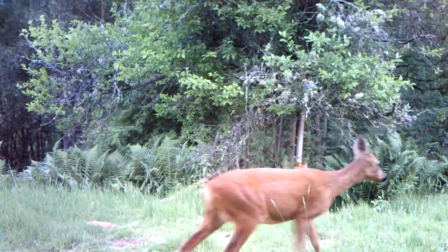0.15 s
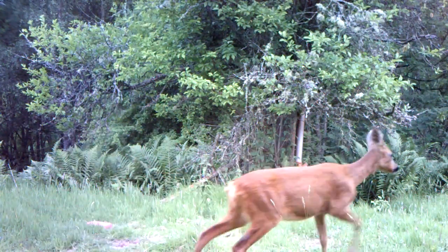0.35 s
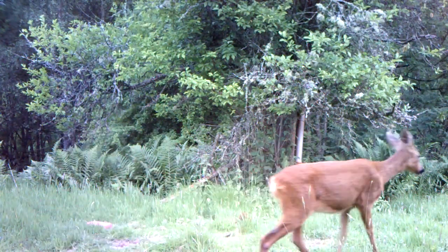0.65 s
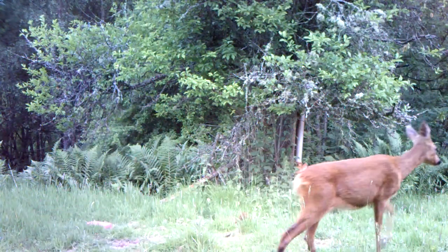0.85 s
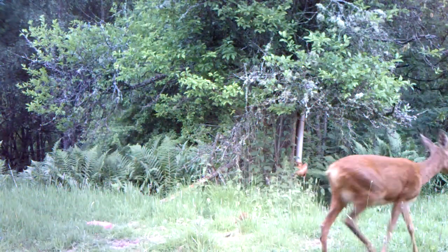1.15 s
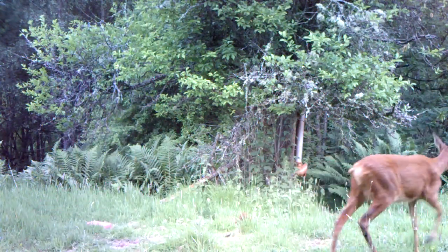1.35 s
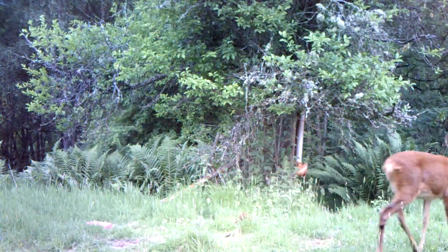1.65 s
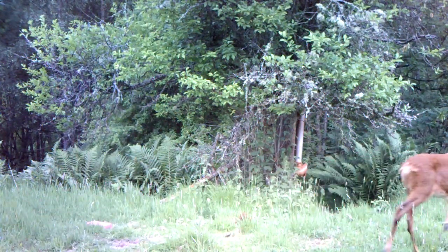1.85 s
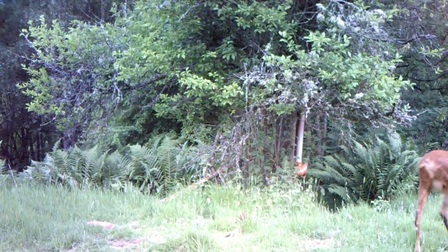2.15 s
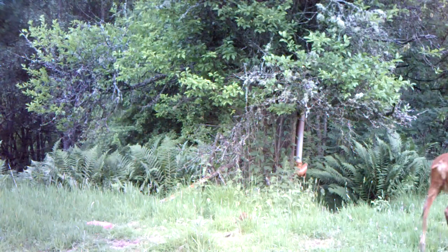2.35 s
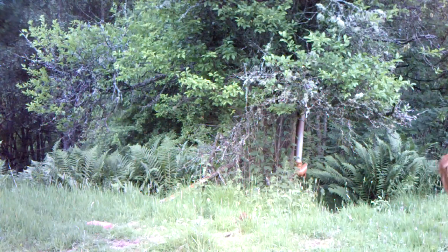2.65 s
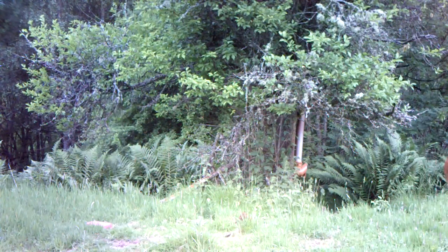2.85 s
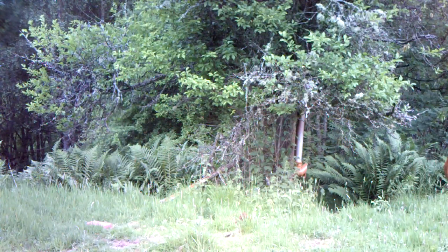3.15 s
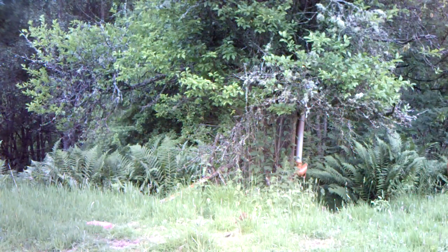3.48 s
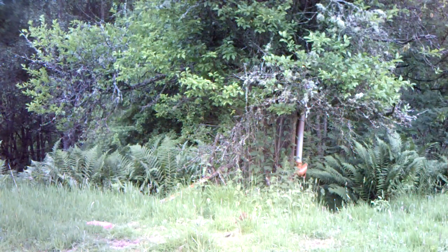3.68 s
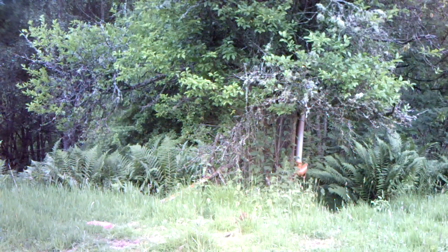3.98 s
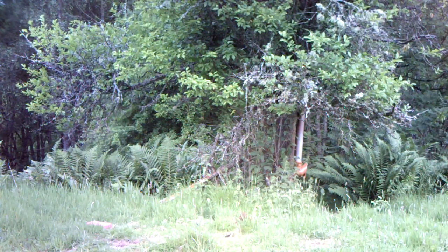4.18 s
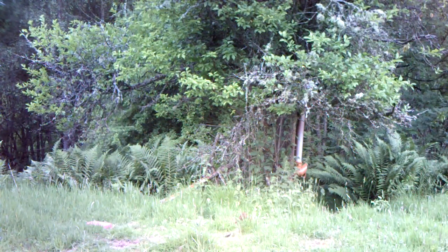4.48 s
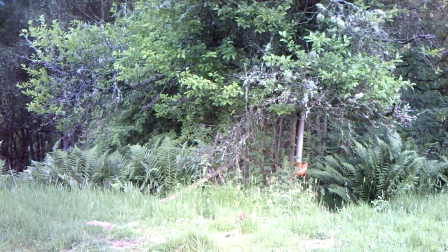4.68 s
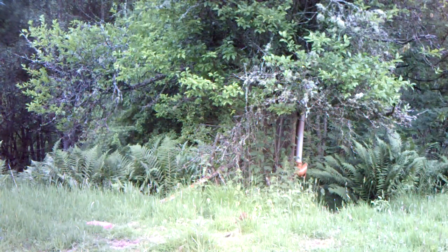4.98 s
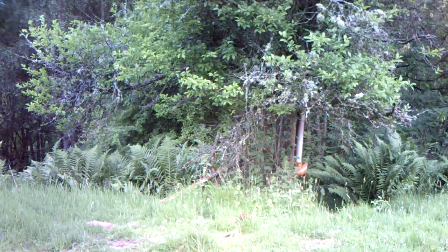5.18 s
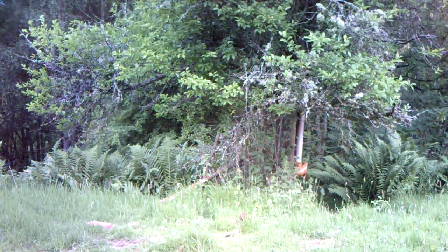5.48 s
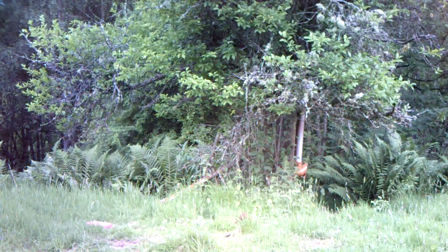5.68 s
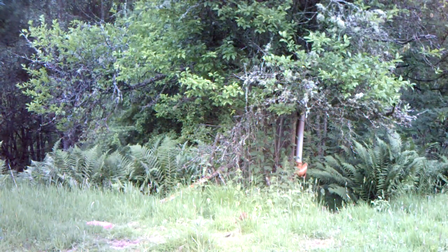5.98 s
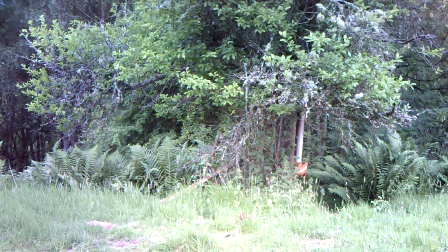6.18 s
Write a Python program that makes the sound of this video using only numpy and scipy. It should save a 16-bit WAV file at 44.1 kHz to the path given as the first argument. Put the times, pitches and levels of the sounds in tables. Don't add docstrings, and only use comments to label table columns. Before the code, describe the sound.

Outdoors at a wood's edge, very quiet, heard through a small fixed microphone with dull upper treble. At 0 s the breathy remains of an earlier bark fade within the first second over a faint, steady far traffic hum. A deer's legs brush the grass in soft, irregular hisses throughout, with tiny dry twig snaps; sharper ones come near 0.7, 1.75 and 2.7 s. A far bird whistles thin, wavering high notes around 1.7 to 2.3 s, a barely audible one near 3.5, then two longer notes at 4.1 and 4.4. Brushing grows closer around 5.3 s. At about 5.45 s a single hoarse bark erupts, roughly a fifth of a second long, low-pitched, rasping and uneven, swelling fast, smoothing slightly and cutting off sharply. Trees return a dull, short tail. Around 6.0 s comes a brief, hollow creak, then light rustle and ticks until 6.3 s.

```python
import sys
import numpy as np
from scipy import signal
from scipy.io import wavfile
from scipy.ndimage import uniform_filter1d

SR = 44100
rng = np.random.default_rng(int(sys.argv[2]) if len(sys.argv) > 2 else 0)


def transcribe(u):
    v = np.clip(np.atleast_2d(u).T, -1, 1)
    q = np.round(v * 32767).astype(np.int16)
    wavfile.write(sys.argv[1], SR, q)


def amplitude_ratio(level_db):
    exponent = np.asarray(level_db, float) / 20
    return 10 ** exponent


N = 279099

# pitch_hz, width_hz, level_db
THROAT = [(633, 167, -4), (966, 240, -7), (1257, 396, 2), (1640, 460, -11.5), (1930, 93, -4),
          (2620, 530, -14), (3144, 340, -17.5), (4740, 520, -24), (7200, 760, -25)]
# pitch_hz, level_db (per Hz)
TRAFFIC_SPECTRUM = [(12, -37), (20, -5), (109, -11), (151, -11.5), (295, -13), (454, -7.5), (661, -5.5),
                    (990, -1), (1300, -5.5), (1740, -17.5), (2340, -22.5), (4600, -24), (10600, -26.5),
                    (12400, -31), (16200, -51), (22000, -120)]
# time_s, level_db
TRAFFIC_LEVEL = [(0.0, -59), (1.0, -60), (2.6, -61), (3.4, -60), (3.9, -61), (6.33, -60)]
# pitch_hz, level_db (per Hz)
GRASS_SPECTRUM = [(1500, -38), (2500, -14), (5000, -3.5), (8000, 1), (11000, -10.5), (12500, -2)]
# middle_s, peak_db, length_s
BRUSHES = [(0.074, -59.5, 0.031), (.14, -65, 0.043), (.235, -65, .04), (0.352, -63, 0.1), (.56, -68, 0.15),
           (.74, -64, 0.056), (1.137, -69, .1), (1.272, -63, .06), (1.635, -69, .06), (1.787, -67, 0.17),
           (2.027, -71, 0.035), (2.13, -68, 0.066), (2.22, -67, .1), (2.627, -70, 0.15), (2.811, -71, 0.16),
           (3.11, -73, 0.05), (3.65, -67, 0.069), (3.8, -67.5, .12), (4.164, -71, 0.068), (4.27, -68, .09),
           (4.71, -68.5, .14), (4.888, -72, .06), (5.02, -67, 0.11), (5.238, -68, 0.068),
           (5.34, -63.5, 0.062), (5.442, -59.5, 0.072), (5.756, -67, 0.23), (6.1, -67, 0.15),
           (6.19, -62.5, .06)]
# start_s, peak_db, centre_hz, t60_s, width_hz
TWIGS = [(.0553, -53, 8500, .008, 5000), (.1176, -55, 7000, .008, 5000), (.1406, -50, 6000, .008, 9000),
         (.2319, -51, 7800, .008, 7000), (.7147, -40, 7000, .011, 10000), (.9582, -54, 5500, .005, 6000),
         (1.2037, -49, 9500, .005, 6000), (1.7534, -40, 6500, .006, 6500), (2.0163, -50, 6000, .006, 9000),
         (2.7138, -37, 9000, .005, 6500), (2.7311, -44, 8500, .004, 5000), (2.797, -54, 2400, .015, 1600),
         (3.0864, -57, 3200, .015, 2200), (4.2472, -51, 9500, .006, 6000), (4.8579, -53, 7000, .006, 7000),
         (4.8988, -52, 8900, .006, 6000), (6.107, -53, 6500, .008, 6000), (6.1794, -54, 6800, .008, 6000)]
# start_s, length_s, peak_db, pitch_hz
WHISTLES = [
    (1.66, .06, -78, 4300),
    (1.875, .21, -72, 4300),
    (2.19, .15, -79, 4340),
    (3.46, .09, -80, 4420),
    (4.13, .23, -74.5, 4350),
    (4.39, .23, -74.5, 4400),
]
# time_s, level_db
BARK_EFFORT = [
    (5.43, -81),
    (5.465, -40),
    (5.483, -35.5),
    (5.49, -32.5),
    (5.52, -28.5),
    (5.604, -32.5),
    (5.643, -35.5),
    (5.664, -48),
    (5.7, -63),
]
# time_s, extra_db
SLAPS = [
    (5.4885, 10),
    (5.4955, 6),
    (5.5185, 11.5),
    (5.535, 10),
    (5.549, 8),
    (5.5605, 9),
    (5.5835, 10),
    (5.6075, 10.5),
]
# delay_s, level_db, colour_hz, width_hz
ECHOES = [
    (.1, -17.5, 550, 100),
    (.225, -21.5, 660, 170),
    (.27, -30.5, 1300, 600),
]
# pitch_hz, t60_s
TREE_DECAY = [(250, 0.33), (600, 0.42), (1300, 0.48), (2500, 0.75), (5000, 0.56), (10000, 0.27)]


def evened(x):
    return x / np.sqrt(np.mean(x ** 2) + 1e-20)


def read(points, hz):
    f, value = np.transpose(points)
    return np.interp(np.log(hz + 1), np.log(f + 1), value)


def add(mix, start_s, sound):
    part = mix[round(start_s * SR):][:len(sound)]
    part += sound[:len(part)]


def resonate(x, hz, width):
    turn = np.exp(2j * np.pi * np.cumsum(hz * np.ones(len(x))) / SR)
    r = np.exp(-np.pi * width / SR)
    return 2 * (turn * signal.lfilter([1 - r], [1, -r], x / turn)).real


def resonate_twice(x, hz, width):
    return resonate(resonate(x, hz, width), hz, width)


def noise(spectrum, patchy_db, flicker_db, size):
    frames = N * 4 // size + 5
    hz = np.fft.rfftfreq(size, 1 / SR)
    a, b, patches = rng.standard_normal((frames, len(hz), 3)).T
    patches = uniform_filter1d(patches, size=12, axis=0)
    patches = evened(uniform_filter1d(patches, size=10, axis=1))
    flicker = evened(uniform_filter1d(rng.standard_normal(frames), size=5))
    level_db = read(spectrum, hz)[:, None] + patchy_db * patches + flicker_db * flicker
    z = (a + 1j * b) * amplitude_ratio(level_db)
    return evened(signal.istft(z, nperseg=size, noverlap=size * 3 // 4)[1][:N])


def throat(drive, mouth, jaw):
    out = 0
    for i, (hz, width, db) in enumerate(THROAT):
        shift = jaw if i == 0 else mouth
        hollow_db = 14 * (1 - mouth) if i == 0 else 0
        out = out + amplitude_ratio(db + hollow_db) * resonate_twice(drive, hz * shift, width)
    return out


def earlier_bark():
    level_db, t60_s = -59, 1.0
    t = np.arange(SR) / SR
    breath = np.diff(rng.standard_normal(SR), prepend=0)
    far = resonate(resonate(breath, 1700, 1500), 1900, 3000)
    return evened(throat(far, mouth=1.143, jaw=1.05)) * amplitude_ratio(level_db - 60 * t / t60_s)


def traffic():
    swell = amplitude_ratio(np.interp(np.arange(N) / SR, *np.transpose(TRAFFIC_LEVEL)))
    return noise(TRAFFIC_SPECTRUM, patchy_db=1.0, flicker_db=0.0, size=1024) * swell * amplitude_ratio(0.01)


def grass():
    bed_db, snaps_per_s, snap_t60_s = -74, 120, 0.0053
    hiss = noise(GRASS_SPECTRUM, patchy_db=2.0, flicker_db=1.5, size=256)
    snaps = rng.random(N) < snaps_per_s / SR
    snap_size = amplitude_ratio(3.5 * np.minimum(rng.exponential(1, N), 3))
    fade = amplitude_ratio(-60 * np.arange(200) / SR / snap_t60_s)
    crackle = signal.oaconvolve(snaps * snap_size, fade)[:N]
    t = np.arange(N) / SR
    strokes = sum(amplitude_ratio(db) * np.exp(-(2 * (t - s) / length) ** 2) for s, db, length in BRUSHES)
    return evened(hiss * (1 + 1.4 * crackle)) * (amplitude_ratio(bed_db) + strokes) * amplitude_ratio(-4.5)


def tick(peak_db, hz, t60_s, width):
    t = np.arange(round(.04 * SR)) / SR
    burst = rng.standard_normal(len(t)) * amplitude_ratio(-60 * t / t60_s)
    burst[0] = 2.5
    sound = resonate_twice(burst, hz, width)
    return amplitude_ratio(peak_db) * sound / abs(sound).max()


def whistle(length_s, peak_db, hz):
    rise_s, settle_s = .04, .03
    t = np.arange(0, length_s, 1 / SR)
    waver, flutter = (evened(uniform_filter1d(v, size=500)) for v in rng.standard_normal((2, len(t))))
    pitch = hz + 130 * np.exp(-t / rise_s) + 300 * t + 22 * waver
    fuzz = evened(resonate(rng.standard_normal(len(t)), pitch, 110))
    tone = np.sqrt(2) * np.sin(2 * np.pi * np.cumsum(pitch) / SR)
    late = np.maximum(t - rise_s, 0)
    shape_db = -4 * np.minimum(late / settle_s, 1) - 22 * late + 1.5 * flutter
    rise = np.minimum(t / rise_s, 1) ** 2
    note = .87 * tone + .45 * fuzz
    return amplitude_ratio(peak_db + shape_db) * rise * note * signal.windows.tukey(len(t), .2)


def fold_pulses(t, start_s, turns, hz, rough):
    jitter, uneven_db, rasp = .2, 3, .7
    cycles = np.flatnonzero(np.diff(turns // 1))
    rough = rough[cycles]
    late, strength = rng.standard_normal((len(cycles), 3, 2)).T
    place = np.arange(3)[:, None] / 3 + jitter * rough * late
    at = np.clip(cycles + place * SR / hz[cycles], 0, len(t) - 1).astype(int)
    pulses = np.zeros(len(t))
    pulses[at] = amplitude_ratio(uneven_db * rough * strength) * np.array([2 - rough, rasp * rough, rasp * rough])
    for slap_s, db in SLAPS:
        at = round((slap_s - start_s) * SR)
        pulses[at - 90:at + 60] = 0
        pulses[at] = amplitude_ratio(db)
    return evened(pulses)


def bark():
    breath, soft_hz = .25, 1800
    open_s, shut_s = 5.505, 5.65
    clear_s, clear_share = 5.6075, .25
    s, effort = np.transpose(BARK_EFFORT)
    t = np.arange(s[0], s[-1], 1 / SR)
    effort_db = np.interp(t, s, effort)
    hz = 168.5 - 1050 * np.maximum(t - 5.52, 0) ** 2
    turns = np.cumsum(hz) / SR
    turns -= np.interp(clear_s, t, turns)
    rough = np.where(t < clear_s, 1, clear_share)
    drive = fold_pulses(t, s[0], turns, hz, rough)
    drive = signal.lfilter(*signal.butter(1, soft_hz, fs=SR), drive)
    drive += breath * np.sqrt(rough) * rng.standard_normal(len(t))

    chest = np.sqrt(2) * amplitude_ratio(-57.5) * np.sin(2 * np.pi * turns)
    low = resonate(resonate(drive + rng.standard_normal(len(t)), 290, 220), 350, 220)
    rattle = amplitude_ratio(-53.5 - 50 * (t - s[0])) * evened(low)
    rise = np.minimum((t - s[0]) / .035, 1) ** 2
    voiced = rise * amplitude_ratio(-900 * np.maximum(t - 5.645, 0))

    when = s[0], open_s, shut_s
    mouth = np.interp(t, when, (.97, 1.03, .92))
    jaw = np.interp(t, when, (.66, 1.05, .88))
    rasping = evened(throat(drive, mouth, jaw))
    sound = amplitude_ratio(effort_db) * rasping + voiced * (chest + rattle)
    return s[0], sound * signal.windows.tukey(len(t), .05)


def trees(x):
    taps = np.zeros(SR)
    at = np.arange(500, SR - 20, 20)
    spots = at + rng.integers(0, 20, len(at))
    signs = rng.choice([-1., 1.], len(at))
    taps[spots] = signs
    hz, t, z = signal.stft(taps, SR, nperseg=256)
    fade = amplitude_ratio(-60 * t / read(TREE_DECAY, hz)[:, None])
    tail = signal.istft(z * fade, SR, nperseg=256)[1]
    return signal.fftconvolve(x, tail / np.linalg.norm(tail))[:N]


def echoes(x):
    out = np.zeros(N)
    for delay_s, db, hz, width in ECHOES:
        add(out, delay_s, amplitude_ratio(db) * resonate_twice(x, hz, width))
    return out


def creak():
    start_s, length_s, peak_db = 6.008, .062, -57.5
    first_hz, last_hz = 128, 106
    u = np.arange(0, length_s, 1 / SR) / length_s
    turns = np.cumsum(first_hz + (last_hz - first_hz) * u) / SR
    pulses = np.diff(turns // 1, prepend=0)
    ring = resonate(resonate_twice(pulses, 1400, 620), 1400, 620)
    body = amplitude_ratio(-13) * evened(resonate_twice(pulses, 180, 300))
    return start_s, amplitude_ratio(peak_db - 12 * (2 * u - .95) ** 2) * (evened(ring) + body)


def scene():
    deer, small = np.zeros(N), np.zeros(N)
    add(deer, *bark())
    add(deer, *creak())
    add(small, 0, earlier_bark())
    for start_s, *snap in TWIGS:
        add(small, start_s, tick(*snap))
    add(small, 5.475, tick(peak_db=-43, hz=5500, t60_s=.025, width=7000))
    for start_s, *note in WHISTLES:
        add(small, start_s, whistle(*note))
    hum = traffic()
    wood = amplitude_ratio(-13.5) * trees(deer) + echoes(deer)
    return (deer + wood + small + hum + grass())[None]


def roll_off(x):
    return signal.sosfilt(signal.butter(12, 12580, fs=SR, output="sos"), x)


def record(dry):
    narrow = signal.oaconvolve(dry, signal.firwin(1023, 12040, fs=SR)[None], "same")
    return roll_off(narrow)


dry = scene()
out = record(dry)
transcribe(out)
```